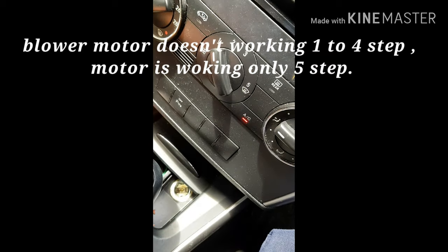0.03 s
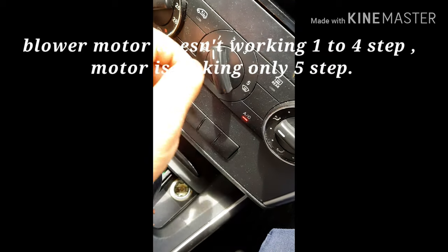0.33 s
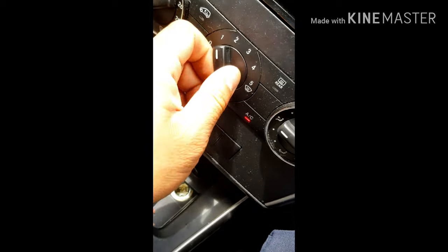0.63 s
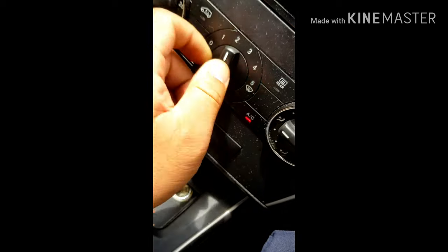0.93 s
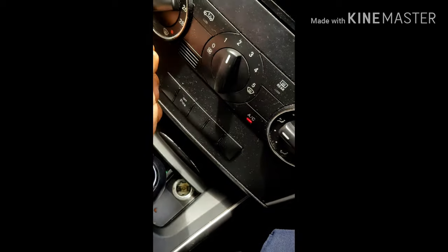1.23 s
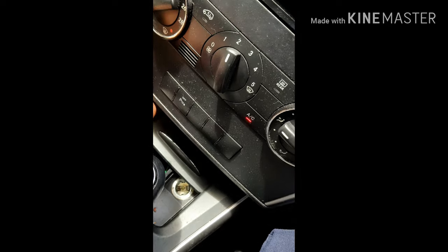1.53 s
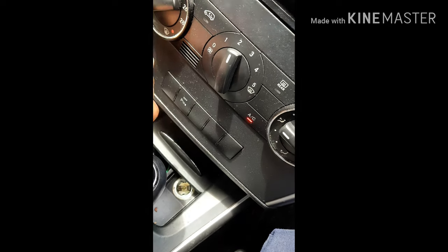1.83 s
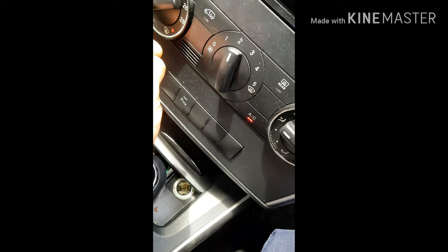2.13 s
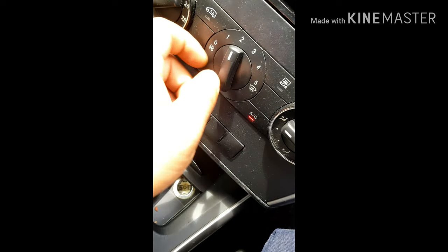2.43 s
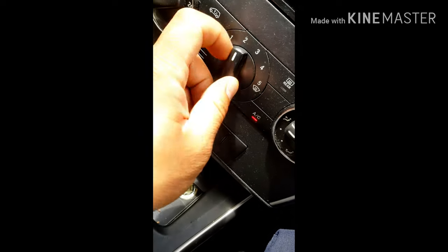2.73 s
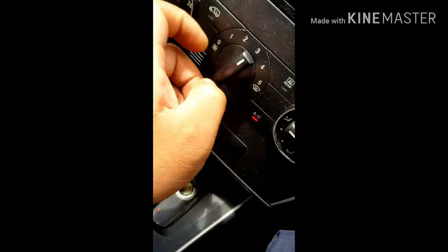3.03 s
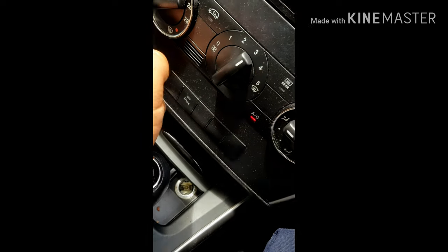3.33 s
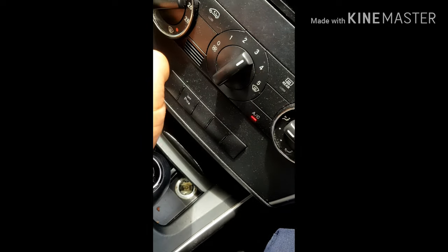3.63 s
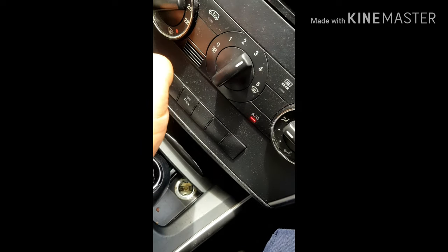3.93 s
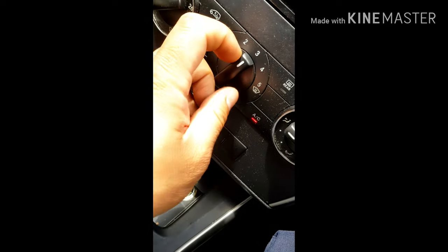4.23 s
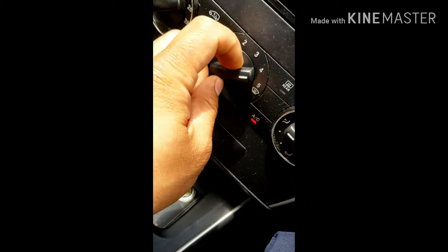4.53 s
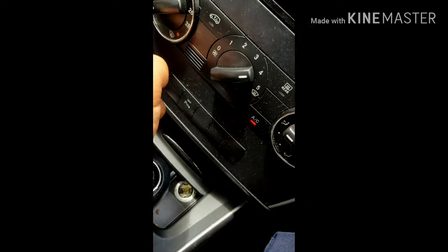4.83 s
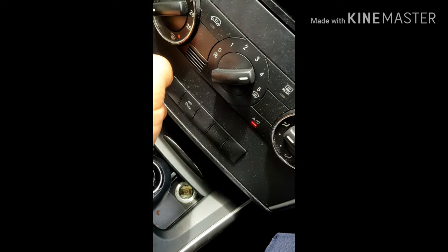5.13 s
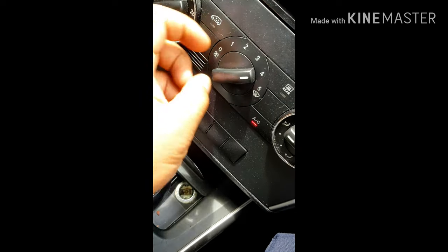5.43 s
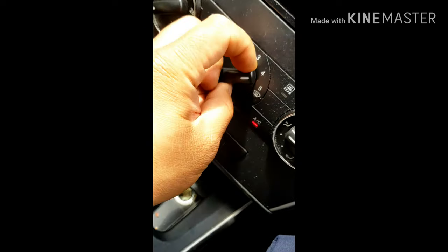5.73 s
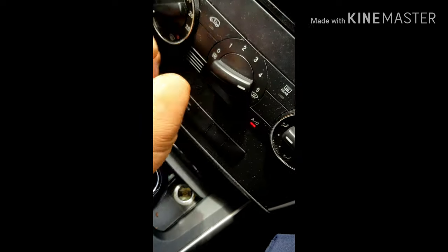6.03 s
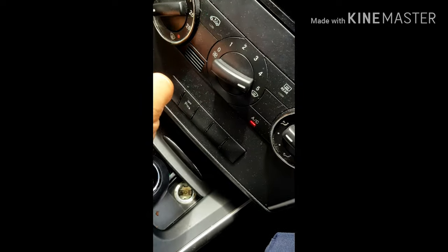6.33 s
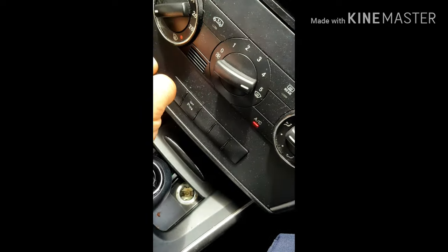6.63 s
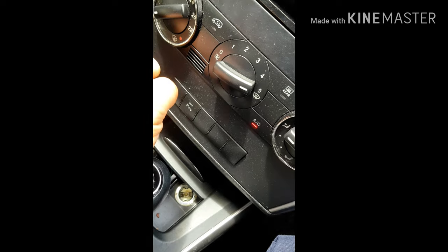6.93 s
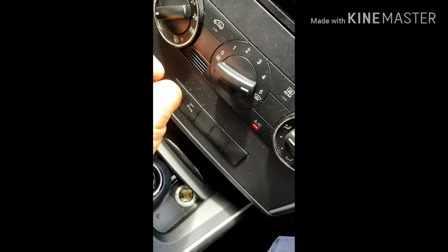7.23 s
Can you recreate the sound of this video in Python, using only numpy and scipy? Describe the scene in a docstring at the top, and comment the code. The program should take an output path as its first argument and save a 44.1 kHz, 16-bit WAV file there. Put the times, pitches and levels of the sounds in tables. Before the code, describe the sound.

Four crisp, widely spaced plastic clicks come from a dashboard knob at arm's length, over the soft boom of an idling engine heard from inside the car. Fingers lightly tap and rub the plastic. The first three clicks start nothing, but the last sets the fan going at once, and a loud, even rush of vent air fills the cabin to the end.

```python
"""A blower knob clicks through four detents, heard from the driver's seat of an idling car on two
spaced microphones. At each step a spring ticks over its ridge and snaps home, ringing the dashboard;
fingers bump and rub the plastic. The first three steps leave the fan dead. On the last it spins up
and air rushes out of the vents. Underneath, the engine booms in the cabin and sags under the load."""
import sys
import numpy as np
from scipy import signal
from scipy.fft import rfft, irfft, next_fast_len
from scipy.io import wavfile

SR = 44100
rng = np.random.default_rng(int(sys.argv[2]) if len(sys.argv) > 2 else 0)


def transcribe(signal):
    """Save signal, clipped to [-1, 1], as a 16-bit WAV file at the path in sys.argv[1]."""
    frames = np.atleast_2d(signal).T
    limited = np.clip(frames, -1, 1)
    pcm = np.round(limited * 32767).astype(np.int16)
    wavfile.write(sys.argv[1], SR, pcm)


N = 330309
T, HZ = np.arange(N) / SR, np.fft.rfftfreq(N, 1 / SR)
FAN_ON_S = 5.937

# The knob's detents, at arm's length. Each row: snap time in seconds, level in dB, treble tilt in dB
# per octave, left over right in dB, knock pitch in Hz, knock in dB re the snap, the tick's head start
# in seconds, tick in dB re the snap.
DETENTS = [(.815, -23, 0, 0, 1280, -13, .012, -6), (2.878, -19.5, 0.9, 1, 700, -2.5, 0.0071, -25),
           (4.5177, -19.5, -0.5, 3, 756, -6, .0056, -33.5), (5.8593, -18.5, 1.4, 2, 1290, -11, 0.0069, -26)]
# Fingers bumping the knob. Each row: start in seconds, level in dB, treble tilt in dB per octave,
# left over right in dB, ring pitch in Hz, thud level in dB.
TAPS = [(.493, -61, 1, -4, 2700, -75), (0.5525, -41, -5, -4.5, 2620, -62),
        (4.1903, -43, -6, 0, 2680, -38.5), (4.628, -34, -3.5, 1, 2290, -36.5)]
# Colour of struck plastic. Each row: frequency in Hz, relative level in dB.
PLASTIC_COLOUR = [(120, -19), (250, 0), (480, -1.5), (720, -6.5), (950, 4), (1300, 2.5), (1620, -8),
                  (2100, -1.5), (3800, -2), (5400, -7.5), (6500, -7), (8400, -8.5), (11800, -9.5),
                  (15500, -17)]
# How long the plastic rings. Each row: frequency in Hz, t60 in seconds.
PLASTIC_DECAY = [(300, 0.1037), (900, 0.079), (2500, 0.057), (6000, 0.035), (14000, 0.033)]
# Dashboard modes, from thunk to tick. Each row: frequency in Hz, t60 in seconds, level in dB.
PANEL_MODES = [(270, 0.012, -12), (702, 0.065, -24), (1160, .05, -25), (2380, 0.05, -20),
               (2810, 0.067, -24), (3940, 0.085, -12.5), (4190, 0.048, -20), (6280, 0.04, -21)]
# The panel's dull thud and shudder. Each row: frequency in Hz, relative level in dB.
SHUDDER_COLOUR = [(80, -16), (180, -3), (400, -9.5), (600, -12.5), (780, -20), (2000, -43)]
# Vent air at the microphones. Each row: frequency in Hz, relative level left and right in dB.
AIR_COLOUR = [(31.72, -30, -30), (71.6, 2.5, -3.5), (107, -3, 2), (164, -5, -6.5), (257.5, -0.4, -1.9),
              (381, -14.5, -7.5), (485, -5.5, -16.5), (770, -18.5, -20), (1570, -15, -18.5),
              (2770, -22.5, -24.5), (4600, -27, -29.5), (8200, -32.5, -38), (11050, -33.5, -40.5),
              (15300, -41, -48)]
# Duct and vent resonances. Each row: centre in Hz, width in Hz, lift or cut in dB.
DUCTS = [(622, 52, 1.5), (795, 190, 8), (1295, 130, 8.5), (1490, 220, 1.5), (1803, 37, -14), (2017, 110, 4),
         (2325, 145, 8.5), (2903, 200, 5), (3430, 37, 4.5), (4130, 480, 4.5), (7630, 450, 3.5)]
# Fingers sliding into their grip. Each row: start and hold in seconds, scrape and shudder in dB.
RUBS = [(0.562, 0.028, -68, -70), (2.477, .041, -54.5, -55), (5.576, 0.074, -56.5, -42),
        (5.678, 0.042, -56.5, -46.5)]
# Skin rubbing on plastic. Each row: frequency in Hz, relative level in dB.
SKIN_COLOUR = [(300, -13.5), (700, 2.5), (1300, 3), (1700, -7), (2300, -3), (2950, 1.5), (4500, -3),
               (7000, -7.5), (8600, -4.5), (11700, -9.5), (15300, -17.5)]
# The arm coming and going. Each row: peak time in seconds, half length in seconds, level in dB.
SWISHES = [(0.517, 0.085, -65.5), (1.092, 0.067, -65.5), (2.794, 0.081, -74), (3.205, 0.048, -67.5),
           (4.403, 0.037, -64), (4.86, 0.034, -66.5)]
# Colour of a swish. Each row: frequency in Hz, relative level in dB.
SWISH_COLOUR = [(1000, -21), (4000, -13.5), (5200, -8), (6300, -4), (7500, -13.5), (8600, -13.5),
                (11500, -13.5), (15300, -9.5)]
# The engine's boom in the cabin. Each row: time in seconds, level in dB before trim and load.
BOOM_LEVELS = [(0.1, -28.5), (0.82, -27.5), (1.27, -31.5), (2.05, -30), (2.17, -33.5), (2.59, -36),
               (4.32, -29.5), (4.5, -34.5), (5.15, -26.5), (5.95, -28.5)]
# The engine's higher drone. Each row: time in seconds, level in dB before trim.
DRONE_LEVELS = [(0.1, -50), (1.21, -63.5), (1.31, -49.5), (4.74, -41.5), (5.75, -61), (5.9, -40.5)]
# Weaker engine harmonics. Each row: multiple of the firing rate, level in dB.
HARMONICS = [(1, -49.5), (3, -52.5), (4, -52), (6, -65.5), (7, -63.5), (8, -58.5), (9, -63), (12, -60.5),
             (13, -63)]
# Engine noise from inside the cabin. Each row: frequency in Hz, relative level in dB.
MUFFLED_COLOUR = [(100, -2), (150, -13.5), (175, -9.5), (230, -13), (295, -5), (370, -13.5), (460, -12.5),
                  (600, -22.5), (800, -27.5), (1000, -31.5), (1270, -31), (1500, -43.5), (2100, -45),
                  (5000, -58)]
# Faint whines from the engine bay. Each row: pitch in Hz, level in dB.
WHINES = [(1035, -81), (1710, -90)]
# Background rumble. Each row: frequency in Hz, relative level in dB.
RUMBLE_COLOUR = [(25, -21.5), (45, -7.5), (60, 5), (85, -6.5), (130, -13.5), (200, -32.5), (500, -88)]
# Background hiss. Each row: frequency in Hz, relative level in dB.
HISS_COLOUR = [(2000, -26.5), (4000, -7), (6000, -6), (7200, -9.5), (8400, -5.5), (9500, -2), (11500, 2.5),
               (13800, 2), (15300, 3)]
# How alike the two microphones sound. Each row: frequency in Hz, likeness from 0 to 1.
MIC_LIKENESS = [(60, 0.7), (130, 0.92), (290, 0.78), (640, 0.2), (1400, 0.48), (3000, 0.2), (7000, 0.08),
                (15000, 0.1)]
# How much earlier sound reaches the left microphone. Each row: frequency in Hz, lead in milliseconds.
LEFT_LEAD = [(300, 0.028), (600, .1), (900, 0.34), (1300, 0.53), (2400, 0.4), (5000, 0.406)]
# The right microphone's port, notched in the treble. Each row: frequency in Hz, gain in dB.
RIGHT_PORT = [(150, 0.16), (2500, 0), (4000, 2.5), (6500, 4.5), (7400, -2), (8300, -9.5), (9400, -11),
              (10500, -1.5), (12000, -1), (15000, -2)]


def knob(tick_rise_s=0.00092, snap_rise_s=0.0011, tap_rise_s=0.0007, tick_tilt_db=2):
    """At each detent the spring ticks over its ridge, then snaps home; fingers bump more dully."""
    out, blows = np.zeros((2, N)), []
    for s, db, tilt_db, pan_db, knock_hz, knock_db, early_s, tick_db in DETENTS:
        blows.append((s - early_s, db + tick_db, tick_rise_s, tick_tilt_db, pan_db))
        blows.append((s, db, snap_rise_s, tilt_db, pan_db))
        add(out, s, amp(db + knock_db) * knob_ring(knock_hz))
        add(out, s, amp(db - 20) * panel_thud())
    for s, db, tilt_db, pan_db, ring_hz, thud_db in TAPS:
        blows.append((s, db, tap_rise_s, tilt_db, pan_db))
        add(out, s, amp(db - 11) * knob_ring(ring_hz))
        add(out, s, amp(thud_db) * panel_thud())
    for s, db, rise_s, tilt_db, pan_db in blows:
        offset_s, click = plastic_click(rise_s, tilt_db)
        add(out, s + offset_s, click * amp([[db + pan_db / 2], [db - pan_db / 2]]))
    return out


def plastic_click(rise_s, tilt_db, hold_s=0.0005, tail_db=-34.5, tail_t60=0.35):
    """One blow on the knob: dense plastic modes die fast, the panel rings, the cabin answers softly."""
    size = 12000
    t = (np.arange(size) - 600) / SR  # the click peaks at t = 0
    decay_s = np.maximum(t - hold_s, 0)
    burst = noise(lambda hz: read(PLASTIC_COLOUR, hz) + tilt_db * np.log2((hz + 100) / 2500), size)
    hz, centres = np.fft.rfftfreq(size, 1 / SR), [f for f, _ in PLASTIC_DECAY]
    cabin_tail = amp(tail_db - 60 * decay_s / tail_t60)
    out = np.zeros((2, size))
    for share, (_, t60) in zip(np.eye(len(centres)), PLASTIC_DECAY):
        band = irfft(rfft(burst) * read(list(zip(centres, share)), hz), size)
        out += band * np.hypot(amp(-60 * decay_s / t60), cabin_tail)
    for f, t60, db in PANEL_MODES:
        out += amp(db + tilt_db * np.log2(f / 1500) - 60 * decay_s / t60) * tone(f, t)
    return t[0], out * np.exp(np.minimum(t, 0) / rise_s)


def knob_ring(hz, rise_s=0.00072, t60=0.06):
    """The knob rings briefly on one pitch, a hollow knock."""
    t = np.arange(6000) / SR
    return (1 - np.exp(-t / rise_s)) * amp(-60 * t / t60) * tone(hz, t)


def panel_thud(rise_s=0.0019, t60=0.26):
    """The dashboard panel gives under a blow with a dull thud."""
    t = np.arange(16000) / SR
    return (1 - np.exp(-t / rise_s)) * amp(-60 * t / t60) * table_noise(SHUDDER_COLOUR, len(t))


def blower(spin_up_s=0.083, inertia=1.26, shaft_hz=55.95, rush_db=-26, throb_db=-33, ripple_db=1.74):
    """The fan spins up; turbulence rings the ducts and the unbalanced wheel throbs at the shaft rate."""
    speed = 1 - np.exp(-(np.maximum(T - FAN_ON_S, 0) / spin_up_s) ** inertia)
    # Cabin reflections ripple the spectrum differently at each microphone.
    grid_hz = np.arange(0, SR / 2, 48)
    ripple = rng.standard_normal((2, len(grid_hz))) * np.minimum(grid_hz / 1000, 1)

    def colour(hz):
        ducts = sum(db * bump(hz, centre, width) for centre, width, db in DUCTS)
        reflections = ripple_db * np.array([np.interp(hz, grid_hz, side) for side in ripple])
        return np.array([read(AIR_COLOUR, hz, 1), read(AIR_COLOUR, hz, 2)]) + ducts + reflections

    air = noise(colour)
    roar = signal.sosfiltfilt(signal.butter(2, 4200, fs=SR, output="sos"), air)
    hiss = air - roar
    # Each tenfold of speed adds 34 dB to the fluttering roar and 62 dB to the hiss.
    decades = np.log10(speed + 1e-9)
    rush = roar * amp(34 * decades + 0.4 * drift(17)) + hiss * amp(62 * decades)
    turns = shaft_hz * np.cumsum(speed) / SR + rng.random()
    throb = np.sqrt(2) * speed ** 2 * np.sin(2 * np.pi * turns)
    gust_db = 0.2 * drift(0.87)
    return amp(rush_db + gust_db) * rush + amp(throb_db) * throb


def hand(attack_s=0.0016, release_t60=0.22, slips_per_s=48, slip_db=4, slip_decay_s=0.0018):
    """Skin catches as it lands, then rubs on in small slips; the panel shakes and the arm swishes past."""
    scrape, shake = np.zeros((2, N))
    pace, grain = 1 + 0.35 * drift(30), amp(2 * drift(200))
    for s, hold_s, scrape_db, shudder_db in RUBS:
        release = amp(-60 * np.clip((T - s - hold_s) / release_t60, 0, 2))
        stroke = np.clip((T - s) / attack_s, 0, 1) * release
        since_slip = np.cumsum(pace * (T > s)) / SR % (1 / slips_per_s)
        slips = amp(slip_db) * np.exp(-since_slip / slip_decay_s)
        scrape += amp(scrape_db) * stroke * (grain + slips)
        shake += amp(shudder_db) * stroke
    rub = scrape * table_noise(SKIN_COLOUR) * amp([[-1.5], [1.5]])  # a little to the right
    shudder = shake * amp(3 * drift(60)) * table_noise(SHUDDER_COLOUR)
    swish = sum(amp(db) * bump(T, s, 2 * half_s) for s, half_s, db in SWISHES)
    return rub + shudder + swish * table_noise(SWISH_COLOUR)


def engine(phase, boom_trim_db=1.7, drone_trim_db=-0.5, load_db=-7, waver_db=2.5):
    """Harmonics of the firing rate; the second booms in the cabin and the fifth drones."""
    boom_db = np.interp(T, *np.transpose(BOOM_LEVELS)) + boom_trim_db + load_db * fan_load()
    drone_db = np.interp(T, *np.transpose(DRONE_LEVELS)) + drone_trim_db
    partials = [(2, boom_db), (5, drone_db)]
    partials += [(k, db + waver_db * drift(3.9)) for k, db in HARMONICS]
    hum = np.sqrt(2) * sum(amp(db) * np.sin(k * phase + 2 * np.pi * rng.random()) for k, db in partials)
    return hum * amp([[0.4], [-0.4]])


def firing_phase(idle_hz=24.83, hunt=0.01172, sag=0.0383):
    """Phase of the engine's firings: an idle that hunts a little and sags under load."""
    rate_hz = idle_hz * (1 + hunt * drift(1.5) - sag * fan_load())
    return 2 * np.pi * np.cumsum(rate_hz) / SR


def fan_load(ramp_s=0.393):
    """How far the blower's load on the engine has come on, from zero to one."""
    return np.clip((T - FAN_ON_S) / ramp_s, 0, 1)


def cabin(phase, muffled_db=-48, rumble_db=-44, hiss_db=-70, thin_hiss_db=-79, low_cut_hz=80):
    """Muffled engine noise that throbs with the firings, over rumble, faint hiss and whines."""
    muffled = noise(lambda hz: read(MUFFLED_COLOUR, hz) - 10 * np.log10(1 + (low_cut_hz / (hz + 1)) ** 6))
    muffled *= (1 + 0.089 * np.cos(phase)) * amp(muffled_db - 1.5 * drift(16))
    rumble = amp(rumble_db) * table_noise(RUMBLE_COLOUR)
    hiss = amp(hiss_db) * table_noise(HISS_COLOUR)
    thin_hiss = amp(thin_hiss_db) * noise(lambda hz: 40 * bump(hz, centre=7390, width=2010))
    thin_hiss *= np.clip((T - 0.9) / 0.3, 0, 1)  # fades in about a second in
    whines = np.zeros(N)
    for hz, db in WHINES:
        wavering_hz = hz * (1 + 0.01 * drift(25))
        whines += amp(db) * np.sqrt(2) * np.sin(2 * np.pi * np.cumsum(wavering_hz) / SR)
    return muffled + rumble + hiss + thin_hiss + whines


def noise(colour_db, size=N):
    """Noise of the colour colour_db(hz) at the two spaced microphones, with an rms of one."""
    full = next_fast_len(size)
    hz = np.fft.rfftfreq(full, 1 / SR)
    left, other = rfft(rng.standard_normal((2, full)))
    likeness = read(MIC_LIKENESS, hz)
    lag = np.exp(-2j * np.pi * hz * read(LEFT_LEAD, hz) / 1000)
    right = (likeness * left + np.sqrt(1 - likeness ** 2) * other) * lag
    return unit(irfft(np.array([left, right]) * amp(colour_db(hz)), full)[:, :size])


def table_noise(colour, size=N):
    """Stereo noise coloured by a spectrum table."""
    return noise(lambda hz: read(colour, hz), size)


def tone(hz, t):
    """A sine that reaches the left microphone first."""
    arrival = np.array([t, t - read(LEFT_LEAD, hz) / 1000])
    return np.sin(2 * np.pi * (hz * arrival + rng.random()))


def drift(rate_hz):
    """Random wander below rate_hz, with an rms of one."""
    size = next_fast_len(N)
    hz = np.fft.rfftfreq(size, 1 / SR)
    return unit(irfft(rfft(rng.standard_normal(size)) / (1 + (hz / rate_hz) ** 4), size)[:N])


def amp(db):
    """Decibels to gain."""
    return 10 ** (np.asarray(db) / 20)


def unit(x):
    """Scales to an rms of one."""
    return x / np.sqrt(np.mean(x ** 2) + 1e-30)


def read(points, hz, column=1):
    """Reads a table on a log-frequency axis."""
    table = np.array(points, float)
    return np.interp(np.log(hz + 1), np.log(table[:, 0] + 1), table[:, column])


def bump(x, centre, width):
    """Bell of height one and the given full width at half height."""
    return 2 ** -((2 * (x - centre) / width) ** 2)


def add(mix, s, sound):
    """Mixes a stereo sound in at s seconds."""
    part = mix[:, round(s * SR):][:, :sound.shape[1]]
    part += sound[:, :part.shape[1]]


def scene():
    """Everything heard from the driver's seat."""
    phase = firing_phase()
    return engine(phase) + cabin(phase) + knob() + hand() + blower()


def record(dry, ceiling=0.34, band_limit_hz=15550):
    """The right microphone's port colours it, the hardest clicks overload softly, the top is cut off."""
    right = irfft(rfft(dry[1]) * amp(read(RIGHT_PORT, HZ)), N)
    heard = np.array([dry[0], right])
    heard = heard / (1 + (heard / ceiling) ** 6) ** (1 / 6)
    lowpass = signal.firwin(511, band_limit_hz, window=("kaiser", 9), fs=SR)
    return signal.oaconvolve(heard, lowpass[None], "same")


dry = scene()
out = record(dry)
transcribe(out)
```